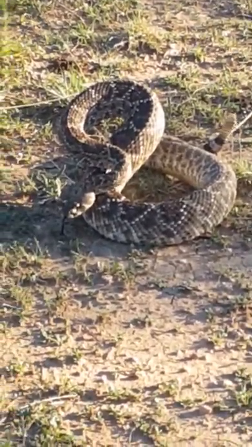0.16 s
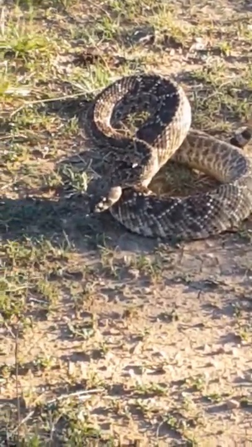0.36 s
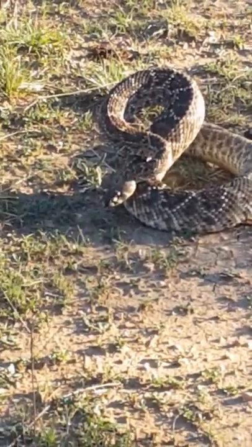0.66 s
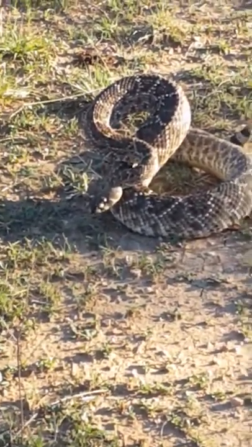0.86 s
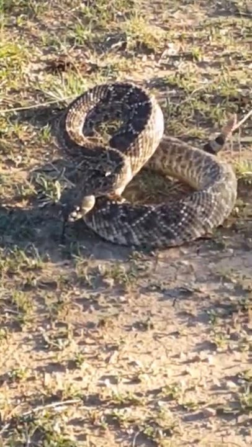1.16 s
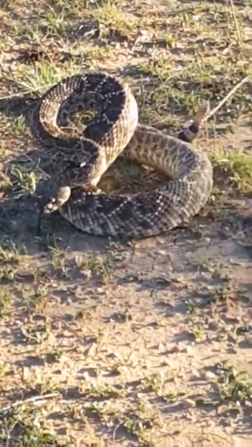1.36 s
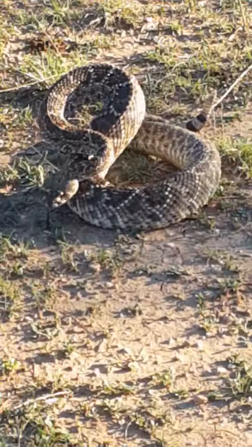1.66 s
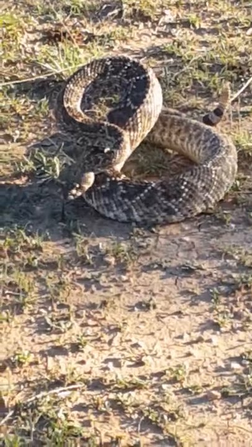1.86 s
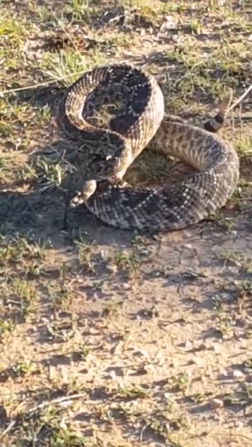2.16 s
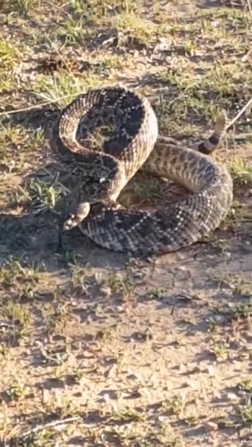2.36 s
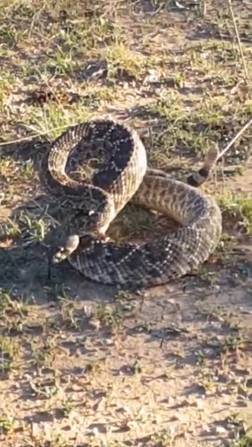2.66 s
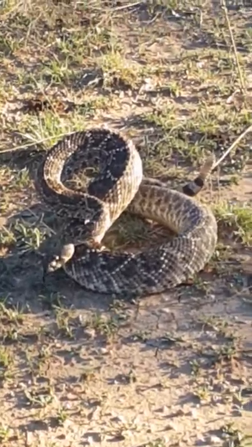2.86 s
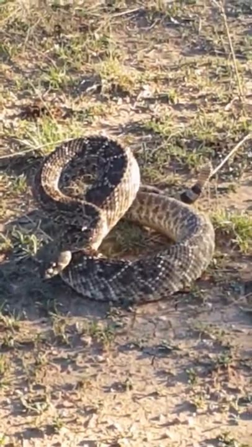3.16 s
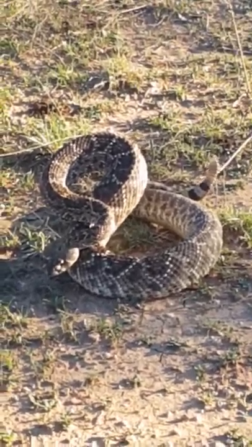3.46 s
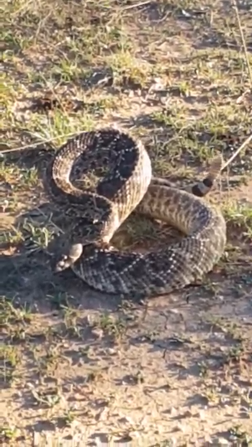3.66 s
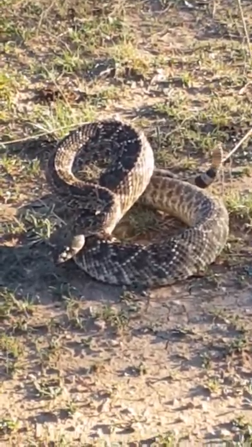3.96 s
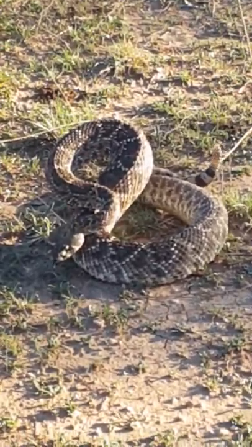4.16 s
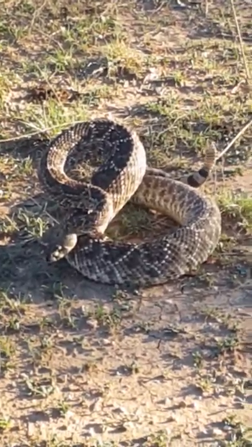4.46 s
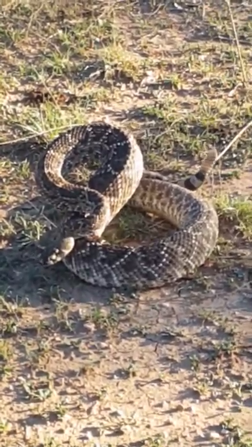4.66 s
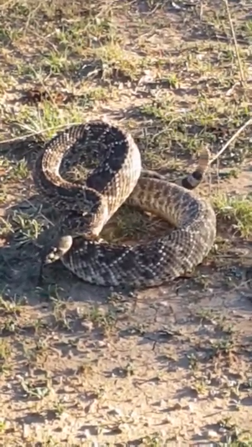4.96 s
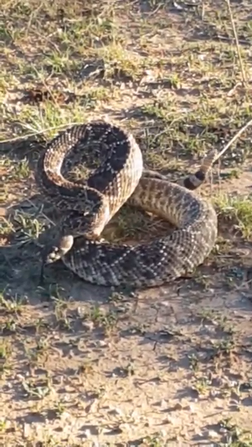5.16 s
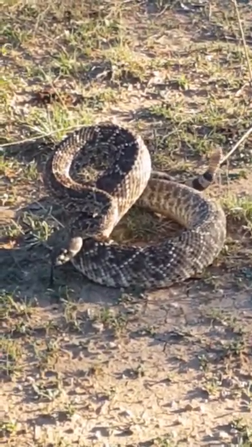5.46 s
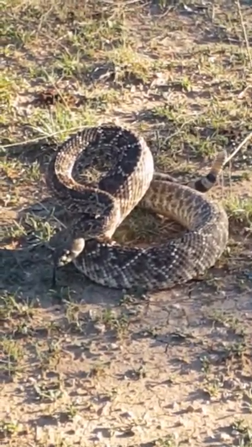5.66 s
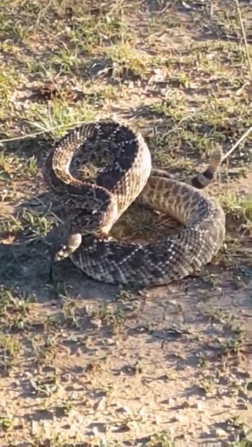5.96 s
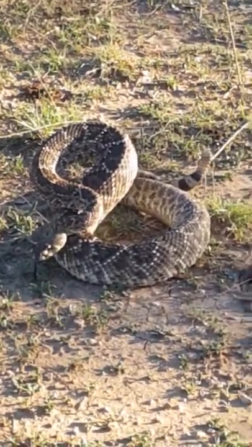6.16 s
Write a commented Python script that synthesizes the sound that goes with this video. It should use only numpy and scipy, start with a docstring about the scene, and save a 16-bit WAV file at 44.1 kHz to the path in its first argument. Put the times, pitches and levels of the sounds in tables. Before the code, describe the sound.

From the first instant a rattlesnake shakes its tail close to the microphone: a dry, high, hissing buzz of tiny clicks, pulsing about 24 times a second and continuing unbroken for all of the roughly six seconds. Behind it lies a faint open-air hush, and within the first second the very faint, wavering tyre hum of a far road rises. A light breeze buffets the microphone in short low gusts, mostly between 0.7 and 3 seconds, with the hardest thump near 1.5 seconds and smaller ones just after. From 3 seconds the wind is mostly weaker, and the rattle sinks slightly while brief harder flicks come more often, the clearest at about 3 and 4.5 seconds. A few soft wind bumps return around 5 seconds and again near 6 seconds, with the snake still rattling at the end.

```python
"""From the first instant a rattlesnake on dry open ground shakes its tail, close to a hand-held camera.
Some 24 times a second the loose, hollow segments collide in a burst of clicks and resonate at 5-7 kHz.
Within a second the tyre hum of a far road rises out of the hush, and a light breeze freshens; its
turbulence buffets the two microphone ports, with the hardest thump near 1.5 s. From 3 s on the breeze
is mostly weaker and hard flicks of the tail come more often; the rattle tires a little but never stops."""
import sys
import numpy as np
from scipy import signal
from scipy.fft import rfft, irfft, next_fast_len
from scipy.io import wavfile
from scipy.ndimage import map_coordinates

SR = 44100
rng = np.random.default_rng(int(sys.argv[2]) if len(sys.argv) > 2 else 0)


def pcm_store(signal):
    """Save signal as 16-bit PCM."""
    levels = np.round(np.clip(np.atleast_2d(signal), -1, 1) * 32767)
    wavfile.write(sys.argv[1], SR, levels.astype(np.int16).T)


N = 278094

# Spectrum of still outdoor air. Each row: frequency in Hz, relative density in dB.
AIR_SPECTRUM = [(25, 7), (100, 1), (300, -6), (430, -0.5), (550, 2.5), (800, -10), (1150, -3.5),
                (1500, -15), (4000, 1.5), (15000, -34.5)]
# Far tyre hum. Each row: time in seconds, low band's pitch in Hz, low and high relative levels in dB.
TYRE_HUM = [(0, 741, -63.5, -85), (.6, 725, -60, -71.5), (1.5, 722, -60, -69), (2.2, 655.3, -62, -66.5),
            (2.7, 671, -60, -67), (3.5, 665.8, -63, -65.5), (4.4, 692, -60.5, -60.5),
            (5.2, 708, -59, -61.5), (5.5, 694, -63.5, -66), (5.9, 698.5, -59, -62.5),
            (6.3, 677, -65.5, -67)]
# Breeze on the sheltered left port. Each row: time in seconds, relative level in dB.
BREEZE_LEVEL = [(0, -57), (.55, -56.5), (.8, -49.5), (1.3, -49), (1.8, -52.5), (2.15, -49), (2.9, -56.5),
                (3.8, -64.5), (4.5, -63.5), (5.1, -59), (5.7, -58), (6.3, -53)]
# Gusts. Each row: centre in seconds, half-length in seconds, left and right relative peaks in dB.
WIND_GUSTS = [(0.037, 0.071, -51, -42.5), (.44, 0.037, -66, -40.5), (0.698, 0.043, -43.5, -47),
              (0.866, 0.056, -53, -36.5), (1.82, 0.12, -41, -36.5), (2.382, 0.1, -50.5, -37),
              (2.679, 0.076, -49, -38.5), (3.02, 0.041, -49.5, -42.5), (3.486, 0.055, -45.5, -45.5),
              (4.066, 0.042, -67, -47.5), (4.72, .05, -55, -46.5), (5.173, 0.026, -58, -37),
              (5.398, .03, -64, -44), (5.66, 0.075, -62, -48), (6.18, 0.062, -42.5, -38.5)]
# Spectrum of the buffeting. Each row: frequency in Hz, relative density in dB.
BUFFET_SPECTRUM = [(20, -20), (40, -16), (65, -2), (105, 1), (160, -11), (230, -28), (330, -25.5),
                   (700, -46)]
# Spectrum of the finer eddies in strong gusts. Each row: frequency in Hz, relative density in dB.
EDDY_SPECTRUM = [(50, -33), (110, 4.5), (175, 5), (250, -5), (350, -21.5), (500, -31), (1200, -45)]
# Single eddies striking the ports. Each row: centre in seconds, left and right envelope peaks in dB.
EDDY_THUMPS = [(1.309, -44, -24), (1.453, -14.5, -42), (1.678, -23.5, -51), (1.827, -22, -36),
               (2.406, -43, -25.5), (4.919, -27, -39), (4.985, -27.5, -53), (5.036, -46, -25.5),
               (5.17, -50, -24), (5.867, -30, -46), (5.953, -55, -25), (6.181, -33, -18.5)]
# Slowly tiring effort of the tail. Each row: time in seconds, relative level in dB.
TAIL_EFFORT = [(0, -41.5), (.75, -40.5), (1.05, -43), (1.35, -40.5), (1.65, -42.5), (2.66, -40), (2.8, -42),
               (3.3, -42.5), (4.6, -43), (5.5, -42.5), (5.87, -45.5), (6.2, -42.5)]
# Harder flicks, a swell or two long. Each row: centre in seconds, gain in dB.
TAIL_FLICKS = [(.385, 2.5), (1.855, 2.5), (2.995, 4), (3.355, 2), (3.78, 2.5), (4.085, 2.5), (4.29, 3),
               (4.45, 5.5), (4.78, 2.5), (5.07, 2), (5.35, 1.5), (5.64, 1.5)]
# Brief falters of the tail. Each row: centre in seconds, loss in dB.
TAIL_FALTERS = [(1.95, 2), (2.43, 2.5), (5.7, 2.5)]
# Delay of the swells behind a steady beat. Each row: time in seconds, lag in seconds.
SWELL_LAG = [(0, 0.012), (.43, .011), (.62, 0.021), (.9, 0.021), (1.13, 0.033), (1.42, 0.032), (1.8, 0.049),
             (2.06, 0.044), (2.26, 0.032), (3.15, 0.044), (4.04, .039), (4.39, .0205), (4.8, 0.031),
             (5.03, .022), (5.65, .022), (5.78, .028), (6.3, .009)]
# Spectrum of the brief diffuse haze after each click, strongest in the treble.
# Each row: frequency in Hz, gain in dB.
HAZE_SPECTRUM = [(2500, -11), (6000, -10.5), (13000, 0)]
# Resonance of the hollow segments at each port. Each row: frequency in Hz, relative gain in dB.
RESONANCE_LEFT = [(300, -21), (1950, -30.5), (2450, -20), (2950, -23), (3950, -10), (5150, -9),
                  (5950, -3.5), (6600, -18.5), (7700, -14.5), (9300, -32), (10700, -26), (11400, -26.5),
                  (14400, -24.5), (15700, -30)]
RESONANCE_RIGHT = [(300, -39), (1950, -27.5), (2450, -21), (3380, -23), (4650, -3), (5850, -2.5),
                   (6550, 0.1), (7850, -19), (9800, -28), (10700, -23.5), (12300, -18), (13100, -28.5),
                   (14600, -23), (15700, -22)]
# Diffraction round the camera body. Each row: frequency in Hz, phase lead of the left port in radians.
DIFFRACTION_PHASE = [(2600, .1), (3250, 1), (4150, -.6), (5450, -.2), (6250, -1.9), (7400, .1), (9200, .5),
                     (10900, 6.8), (15500, 7.4)]


def amp(db):
    """Amplitude grows tenfold for every 20 dB."""
    return 10 ** (np.asarray(db) / 20)


def unit(x):
    """Normalisation to an RMS of one."""
    return x / np.sqrt(np.mean(x ** 2) + 1e-20)


def along(points, hz):
    """Interpolation of (Hz, value) points on a logarithmic frequency axis."""
    f, v = np.transpose(points)
    return np.interp(np.log(hz + 1), np.log(f + 1), v)


def curves(rows):
    """Linear interpolation in time: one value per sample for each column after the first."""
    s, *cols = np.transpose(rows)
    return [np.interp(np.arange(N) / SR, s, c) for c in cols]


def wobble(rate):
    """Smooth random fluctuation: a spline through rate knots a second."""
    return map_coordinates(rng.standard_normal(int(N * rate / SR) + 4), [np.arange(N) * rate / SR])


def bump(s, half_s):
    """A Gaussian rise and fall around the time s."""
    return np.exp(-((np.arange(N) / SR - s) / half_s) ** 2)


def filtered(x, response):
    """Linear filtering: the spectrum of x times a complex frequency response."""
    size = 2 * next_fast_len(N // 2 + 8192)
    return irfft(rfft(x, size) * response(np.fft.rfftfreq(size, 1 / SR)), size)[..., :N]


def coloured_noise(spectrum):
    """Spectral shaping of two independent white noises."""
    return filtered(rng.standard_normal((2, N)), lambda hz: amp(along(spectrum, hz)))


def pair(a, b, correlation):
    """Partial coherence: left and right are a weighted sum and difference of two unrelated sounds."""
    turn = np.arccos(np.clip(correlation, -1, 1)) / 2
    return np.cos(turn) * a + np.sin(turn) * np.array([b, -b])


def air():
    """Ambient noise: the steady hush of open country, partly coherent at the two ports."""
    return amp(-59) * unit(pair(*coloured_noise(AIR_SPECTRUM), correlation=0.67))


def hum(centre_hz, width_hz, correlation):
    """Quadrature modulation shifts slow noise into a narrow stereo band around a moving pitch."""
    a, b = filtered(rng.standard_normal((2, 2, N)), lambda hz: 1 / (1 + (hz / width_hz) ** 2))
    phase = 2 * np.pi * np.cumsum(centre_hz) / SR
    return unit(pair(*(a * np.cos(phase) + b * np.sin(phase)), correlation))


def road():
    """Narrow-band noise: far tyres sing in two wavering bands that drift together."""
    pitch_hz, low_db, high_db = curves(TYRE_HUM)
    low_gain = amp(low_db - 0.5 + 0.76 * wobble(9))
    low = hum(pitch_hz + 20 * wobble(9), width_hz=93, correlation=0.85)
    high_gain = amp(high_db + 0.53 * wobble(9))
    high = hum(pitch_hz * 1.36 + 18 * wobble(9), width_hz=96, correlation=0.21)
    return low_gain * low + high_gain * high


def off_axis(x, lead_s):
    """Path difference: far sound from one side reaches the left port first."""
    return filtered(x, lambda hz: np.exp(1j * np.pi * hz * lead_s * np.array([[1], [-1]])))


def breeze(windward_db=7.5, lull_db=2):
    """Wind strength at each port: breeze and gusts add in power, and the right port faces the wind."""
    level_db, = curves(BREEZE_LEVEL)
    wander_db = lull_db * np.array([wobble(9), wobble(9)])
    steady = amp(level_db + np.array([[0], [windward_db]]) + wander_db)
    gust_power = sum((amp([[left_db], [right_db]]) * bump(s, half_s)) ** 2
                     for s, half_s, left_db, right_db in WIND_GUSTS)
    return np.sqrt(steady ** 2 + gust_power)


def wind():
    """Turbulence buffets each port; fine eddies grow faster than the flow, so gusts sound brighter."""
    flow = breeze() * amp(2.87 * np.array([wobble(45), wobble(45)]))
    buffet = flow * unit(coloured_noise(BUFFET_SPECTRUM))
    eddies = unit(flow ** 1.66 * unit(coloured_noise(EDDY_SPECTRUM)))
    return amp(-0.5) * buffet + amp(-48.5) * eddies


def thumps(pitch_hz, width_s):
    """An eddy crossing a port is a pressure pulse: a push, a suction and a small rebound."""
    ports = np.zeros((2, N))
    for s, left_db, right_db in EDDY_THUMPS:
        t = np.arange(N) / SR - s
        pulse = -np.sin(2 * np.pi * pitch_hz * t) * np.exp(-np.abs(t) / width_s)
        ports += amp([[left_db], [right_db]]) * pulse
    return ports


def effort(half_s=0.033, ease_s=0.07, ease_share=0.54, waver_db=0.72):
    """Amplitude modulation in dB: a slow decline, flicks after a short easing, falters and a waver."""
    steady_db, = curves(TAIL_EFFORT)
    flick_db = sum(db * (bump(s, half_s) - ease_share * bump(s - ease_s, half_s))
                   for s, db in TAIL_FLICKS)
    falter_db = sum(db * bump(s, half_s) for s, db in TAIL_FALTERS)
    return steady_db + flick_db - falter_db + waver_db * wobble(12)


def shaking(swell_hz, slack_db, skew, uneven, knee, rebound_db):
    """Forced vibration: the force on the segments saturates at each crest and drops into uneven gaps."""
    lag_s, = curves(SWELL_LAG)
    beat = 2 * np.pi * swell_hz * (np.arange(N) / SR - lag_s)
    swell = np.cos(beat) - skew * np.sin(2 * beat)  # a quick rise, a slower fall
    jostle = uneven * wobble(110)  # the loose chain never swings the same way twice
    slack = np.logaddexp(0, 4 * (knee - swell - jostle)) / 4
    rebound = np.cos(3 * beat + 1.4 * wobble(24))  # the chain slaps back about three times a swell
    return unit(amp(-slack_db * slack + rebound_db * rebound + 1.1 * wobble(250)))


def clicks(force, per_second, spread_db, ring, decay_s, candidates=50000):
    """Impacts of segments, more and harder under more force: each is an impulse and a damped ring."""
    chance, normal = rng.random((candidates, 3)), rng.standard_normal((candidates, 2))
    onset = (chance[:, 0] * (N - 1)).astype(int)
    strikes = chance[:, 1] < per_second * N / SR / candidates * np.sqrt(force[onset])
    onset, normal = onset[strikes], normal[strikes]
    pitch_hz = 2000 + 14000 * chance[strikes, 2:]
    size = force[onset] ** 0.45 * amp(spread_db * np.tanh(normal[:, 0])) * np.sign(normal[:, 1])
    age = np.arange(96)  # samples
    shape = (age == 0) + ring * np.cos(2 * np.pi * pitch_hz * age / SR) * np.exp(-age / SR / decay_s)
    return np.bincount((onset[:, None] + age).ravel(), (size[:, None] * shape).ravel(), N)[:N]


def soil_reflection(x, delay_s, sway, gain):
    """Comb filtering: sound interferes with its echo off hard soil, whose path shifts as the tail sways."""
    delay_samples = delay_s * SR * np.exp(sway * wobble(22))
    return x + gain * map_coordinates(x, [np.arange(N) - delay_samples])


def diffuse_haze(x, t60_s):
    """Exponential decay: a brief haze of noise follows each click, unrelated at the two ports."""
    fade = amp(-120 / (t60_s * SR))  # share of the energy left after one sample
    energy = signal.lfilter([1 - fade], [1, -fade], x ** 2)
    haze = np.sqrt(energy) * rng.standard_normal((2, N))
    return filtered(haze, lambda hz: amp(along(HAZE_SPECTRUM, hz)))


def shell_response(hz):
    """Resonance and diffraction: the shells ring after a blow, and each port has its own gain and phase."""
    cepstrum = irfft(np.log(amp(along(RESONANCE_RIGHT, hz))))
    half = len(cepstrum) // 2
    minimum_phase = np.exp(rfft(np.r_[cepstrum[0], 2 * cepstrum[1:half], np.zeros(half)]))
    lead = np.exp(0.5j * along(DIFFRACTION_PHASE, hz))
    left_shade = amp(along(RESONANCE_LEFT, hz) - along(RESONANCE_RIGHT, hz))
    return minimum_phase * np.array([left_shade * lead, 1 / lead])


def rattle():
    """Impact excitation: bursts of clicks ring the hollow, horny shells, most strongly at 5-7 kHz."""
    force = shaking(swell_hz=23.8, slack_db=12, skew=0.25, uneven=0.33, knee=0.49, rebound_db=2.04)
    contacts = clicks(force, per_second=4200, spread_db=2, ring=0.17, decay_s=0.00068)
    echoed = soil_reflection(contacts, delay_s=0.0007004, sway=0.15, gain=0.21)
    shells = filtered(echoed + diffuse_haze(echoed, t60_s=0.019), shell_response)
    return amp(effort() + 1.98) * unit(shells)


def scene():
    """Superposition of the country behind, the snake in front and the breeze on the microphone."""
    country = off_axis(road() + air(), lead_s=0.000063) * amp([[-0.4], [0.4]])
    return country + rattle() + wind() + thumps(pitch_hz=106.5, width_s=0.0024)


def record(dry):
    """Band limiting: the camera passes nothing above 15850 Hz."""
    return filtered(dry, lambda hz: hz < 15850)


dry = scene()
out = record(dry)
pcm_store(out)
```